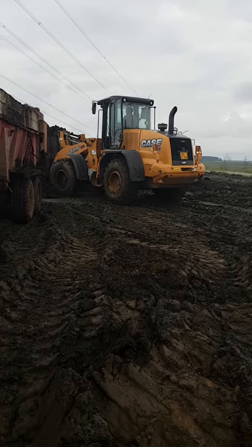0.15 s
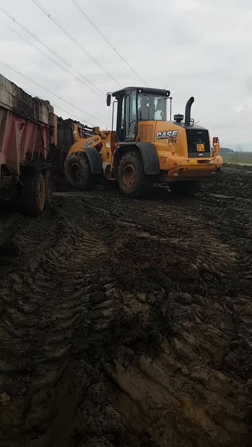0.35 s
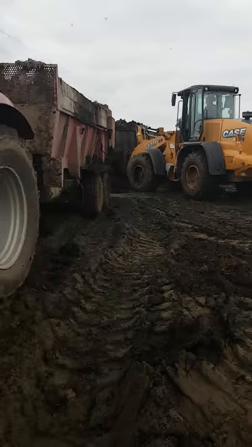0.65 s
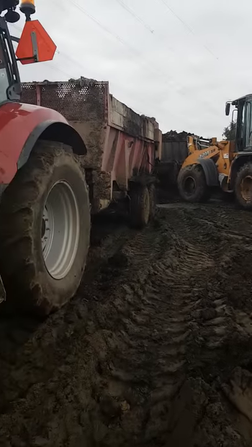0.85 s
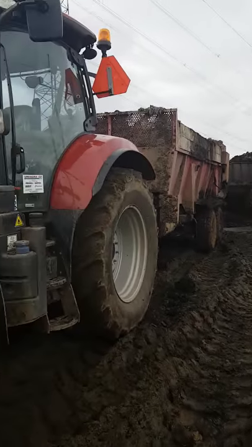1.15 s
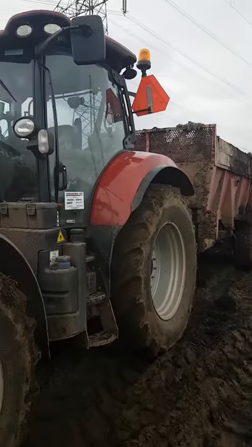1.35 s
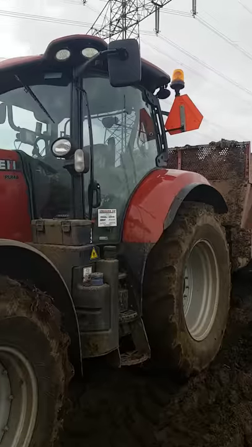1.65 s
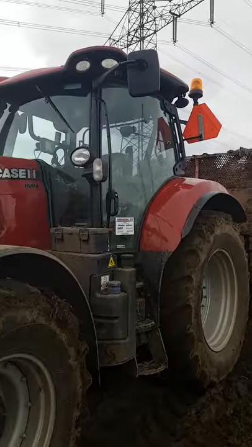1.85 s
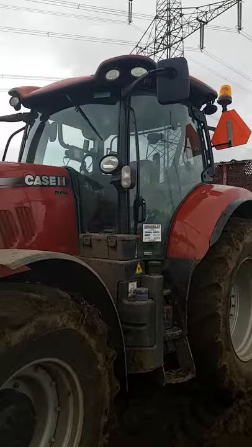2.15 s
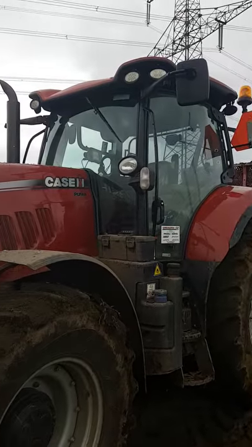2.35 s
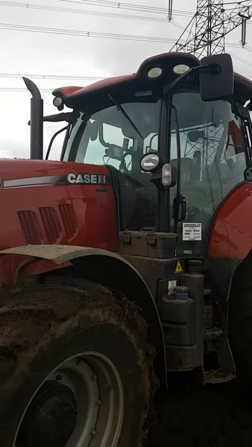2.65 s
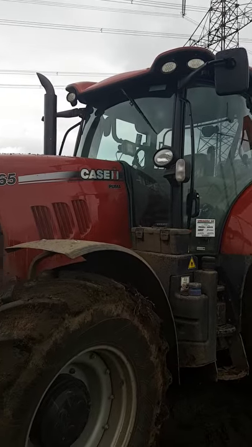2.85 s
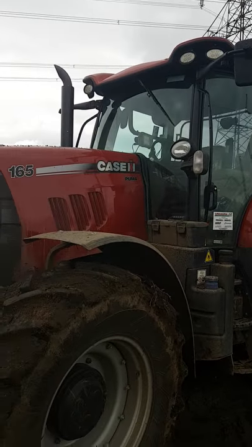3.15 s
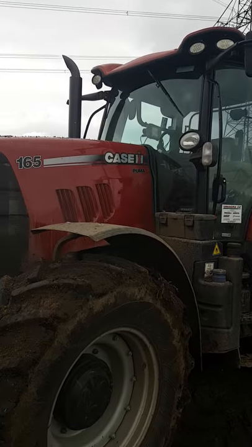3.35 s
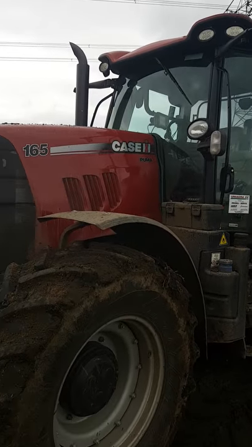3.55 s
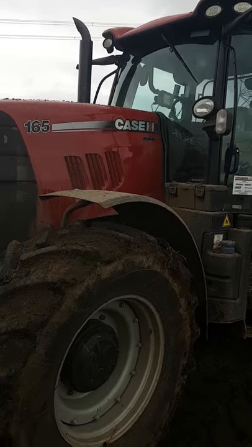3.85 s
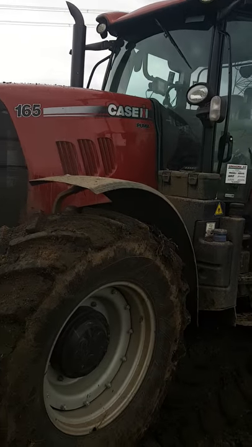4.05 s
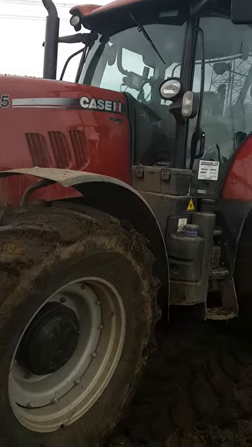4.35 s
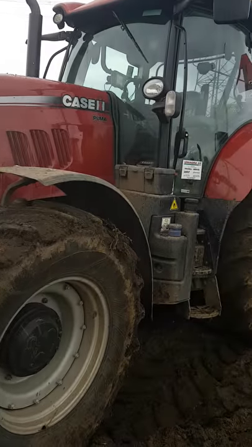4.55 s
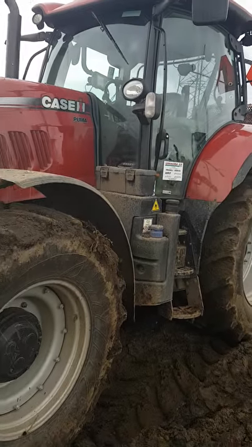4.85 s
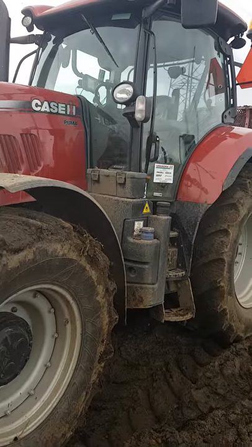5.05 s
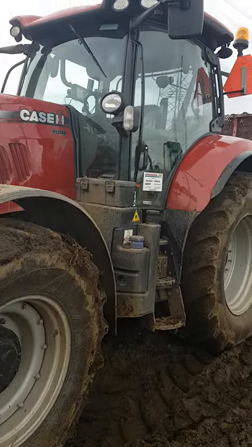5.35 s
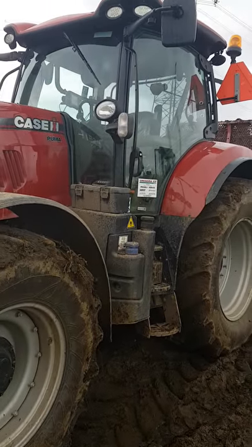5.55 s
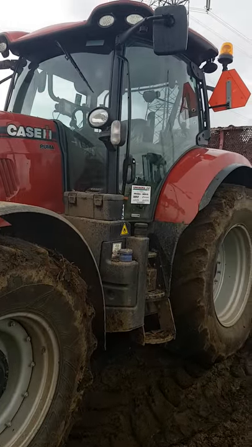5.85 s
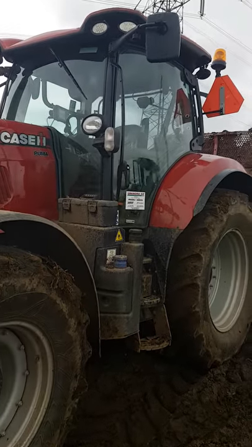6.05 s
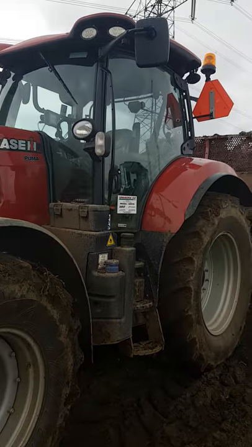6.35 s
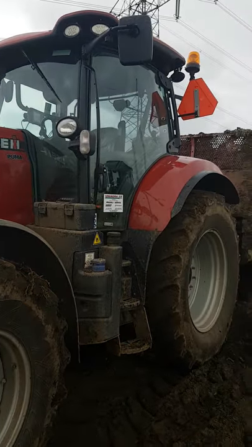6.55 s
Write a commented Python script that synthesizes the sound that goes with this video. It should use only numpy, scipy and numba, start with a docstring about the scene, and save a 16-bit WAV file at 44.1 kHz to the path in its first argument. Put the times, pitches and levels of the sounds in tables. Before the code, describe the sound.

A wheel loader's diesel roars and drones at high revs, dips and surges, then drops lower, beside a ticking idling tractor and squelching mud.

```python
"""A wheel loader works in a muddy field, heard from a hand-held phone beside an idling tractor. Its pump drones
in three partials, its exhaust note climbs and drops, and filtered noise makes the roar of fans and blocks, with
echoes off ground and steel, and an airy intake. The near tractor ticks, rings and squeaks in bursts timed by
its firings; swells of gritty noise squelch under the walker's feet, and once something clanks."""
import sys
import numpy as np
from scipy import signal
from scipy.fft import rfft, irfft
from scipy.io import wavfile
from scipy.ndimage import uniform_filter1d, map_coordinates
from numba import njit

SR = 44100
rng = np.random.default_rng(int(sys.argv[2]) if len(sys.argv) > 2 else 0)


def pcm_store(signal):
    """Save signal as 16-bit PCM."""
    levels = np.round(np.clip(np.atleast_2d(signal), -1, 1) * 32767)
    wavfile.write(sys.argv[1], SR, levels.astype(np.int16).T)


N = 295029


def undb(db):
    """Decibels to gain."""
    return 10 ** (np.asarray(db) / 20)


def level(x, db):
    """Scale to an rms level."""
    return x * undb(db) / np.sqrt(np.mean(x ** 2))


def curves(table):
    """Every column after the time column, interpolated to one value per sample."""
    s, *columns = np.transpose(table)
    t = np.arange(N) / SR
    return [np.interp(t, s, column) for column in columns]


def along(table, hz):
    """Read (hz, value) points on a log-frequency axis."""
    points_hz, values = np.array(table).T
    return np.interp(np.log(hz + 1), np.log(points_hz), values)


@njit
def svf(x, hz, width):
    """State-variable band-pass with a centre and width per sample, gain 1 at the centre."""
    y, band, low = np.empty(len(x)), 0., 0.
    for i in range(len(x)):
        g = np.tan(np.pi * hz[i] / SR)
        damping = width[i] / hz[i]
        v = (band + g * (x[i] - low)) / (1 + g * (g + damping))
        band = 2 * v - band
        low = low + 2 * g * v
        y[i] = damping * v
    return y


def bands(x, table):
    """Sum of fixed resonances, each filtered twice for steepness and set to its own rms level."""
    total = 0
    for hz, width_hz, db in table:
        centre, width = np.full(N, 1. * hz), np.full(N, 1. * width_hz)
        once = svf(x, centre, width)
        total = total + level(svf(once, centre, width), db)
    return total


def walk(rate):
    """Random levels held 1 / rate s and slewed twice; spread near 1."""
    hold = int(SR / rate)
    steps = np.repeat(rng.standard_normal(N // hold + 1), hold)
    slewed = uniform_filter1d(uniform_filter1d(steps, hold), hold)
    return 1.315 * slewed[:N]


def delayed(x, ms):
    """Read a sound a fixed or moving number of milliseconds late."""
    return map_coordinates(x, [np.arange(N) - ms * SR / 1e3], order=3, mode="mirror")


def stereo_noise():
    """Two noises, alike in the bass and mostly unrelated in the treble."""
    # likeness of the two microphones: hz, likeness (0-1)
    likeness = [(30, 0.94), (120, 0.96), (340, 1), (600, 1), (1070, 0.8), (1600, 0), (2300, 0.35),
                (3400, 0.3), (6000, 0), (15000, 0.1)]
    share = np.clip(along(likeness, np.fft.rfftfreq(N, 1 / SR)), 0, 1)
    mid, side = rfft(rng.standard_normal((2, N)))
    left_right = np.sqrt(1 + share) * mid + np.sqrt(1 - share) * side * np.array([[1], [-1]])
    return irfft(left_right, N) / np.sqrt(2)


def partials(hz, levels_db, flutter_db, waver):
    """Clean partials of one wavering pitch; the higher ones flutter more in the moving air."""
    phase = 2 * np.pi * np.cumsum(hz * (1 + waver * walk(12))) / SR
    total = 0
    for k, db in enumerate(levels_db, 1):
        gain = np.sqrt(2) * undb(db + k * flutter_db * walk(25))
        total = total + gain * np.sin(k * phase)
    return total


def pump():
    """Drone with two overtones following pump speed; also returns that speed in octaves from full."""
    # pump drone: start_s, pitch_hz, level_db, second_partial_db
    pump_curve = [(0.0, 203, -13, -51), (0.7, 204.6, -12, -37), (1.1, 206.6, -13, -31.5),
                  (1.54, 210.4, -16, -27), (1.87, 208.3, -23, -26.5), (2.09, 203.1, -26.5, -27),
                  (2.2, 197.9, -33, -26), (2.35, 181.4, -18, -32), (2.53, 175.1, -18, -32),
                  (2.75, 185.9, -21.5, -30), (2.97, 195, -24.5, -19.5), (3.3, 203.5, -26, -19.5),
                  (3.55, 206.5, -21.5, -22), (3.76, 203.5, -20, -21), (3.9, 191.9, -23.5, -21),
                  (3.97, 186.2, -19.5, -35), (4.07, 177.3, -14.5, -33), (4.2, 156.3, -26.5, -41),
                  (4.4, 127.6, -26.5, -47), (4.52, 116.3, -35, -54), (4.62, 121.3, -30, -45),
                  (4.73, 133.8, -23.5, -44), (4.95, 164.2, -24, -51), (5.17, 174.1, -27, -30.5),
                  (5.5, 161.8, -24, -35), (5.83, 168.8, -19, -27), (6.24, 179.8, -19, -40),
                  (6.6, 162.7, -20.5, -34), (6.69, 150.6, -22, -46)]
    full_hz = 205  # full speed
    hz, *levels_db = curves(pump_curve)
    octaves = np.log2(hz / full_hz)
    third_db = -33.5 + 66 * octaves  # dB at full speed and dB per octave: fades fast below it
    return partials(hz, levels_db + [third_db], flutter_db=.5, waver=0.00068), octaves


def exhaust():
    """The loader's firing rate heard as a low note with one overtone."""
    # exhaust note: start_s, firing_hz, level_db, second_partial_db
    exhaust_curve = [(0.0, 76.3, -28.5, -51), (0.3, 80.1, -28.5, -42), (0.6, 81.5, -31, -48),
                     (0.84, 91.4, -45, -50), (1.08, 95.0, -25.5, -42), (1.32, 99.3, -26, -33),
                     (1.6, 98.3, -27, -44), (1.92, 81.6, -42, -44), (2.16, 67.2, -29, -31),
                     (2.4, 65.5, -24, -44), (2.76, 71, -28, -52), (3.0, 77.6, -21.5, -50),
                     (3.3, 82.46, -25, -52), (3.6, 78.7, -25, -50), (3.72, 71.2, -36, -46),
                     (3.84, 66.2, -26.5, -40), (3.96, 64.6, -29, -41), (4.14, 55.2, -47, -54),
                     (4.32, 45, -31, -53), (4.44, 49.74, -27.5, -50), (4.92, 58.9, -26.5, -50),
                     (5.28, 59, -26.5, -33), (5.55, 61.4, -28, -42), (5.8, 62.1, -27.5, -31),
                     (6.12, 63.5, -24.5, -48), (6.48, 58.9, -31, -38), (6.69, 55.8, -39, -52)]
    hz, *levels_db = curves(exhaust_curve)
    return partials(hz, levels_db, flutter_db=0.3, waver=0.0042)


def roar(octaves):
    """Fan and block noise in seven regions, each wandering by itself, plus a bounce off the mud."""
    # overall swell of the roar: start_s, level_db (before the trim in the scene)
    overall = [(0, -27), (.75, -27), (1.5, -27.5), (2.1, -27), (2.5, -29.5), (3.0, -27), (3.5, -26.5),
               (3.85, -27.5), (4.25, -32), (4.7, -32.5), (5.05, -29.5), (5.6, -30.5), (6.2, -29),
               (6.69, -30)]
    # swell of the deepest region: start_s, change_db
    deep = [(0, 0.5), (1, 1.5), (2, -0.5), (3, -1), (3.7, -3), (4.5, 3.5), (5.5, 1.5), (6.3, 5.5),
            (6.69, 6.5)]
    # edges between deep, rumble, body, block, clatter, hiss and air: edge_hz
    edges_hz = (260, 500, 950, 1800, 3600, 9000)
    # those seven regions: level_db, extra_in_plain_sight_db, db_per_octave of pump speed
    regions = [(4.5, -1.5, 4), (7, -4, 4), (-2.5, 2.5, 0), (0.5, -6.5, 3.5), (-2.5, -0.5, 4), (-18, 1, -3),
               (-23.5, 0.5, 4)]
    # spectral shape inside the regions, blocks and exhausts: hz, relative_db per Hz
    block_colour = [(25, -21), (45, -21.5), (70, -5), (100, -9), (135, 0.5), (210, -6.5), (330, -9),
                    (500, -9.5), (700, -6.5), (1000, -15), (1300, -15), (1900, -21.5), (2350, -19),
                    (3100, -30.5)]
    # and above them cooling air: hz, relative_db per Hz
    hiss_colour = [(4200, -39), (4850, -45.5), (5700, -43.5), (7500, -48), (9500, -54.5), (11500, -55),
                   (15500, -59.5)]
    # bounce off the ground, its lag drifting as the phone moves: start_s, left_ms, right_ms
    ground_lag = [(0, 1.5, 1.04), (.6, 1.46, 1.22), (1.2, 1.1, 0.85), (2.2, 0.93, 0.77), (3.8, .75, 0.85),
                  (4.5, 0.92, 0.79), (6.69, 0.89, 0.78)]
    hidden_from_s, hidden_by_s = 0.47, 1.78  # the tractor slides in front of the loader

    hz = np.fft.rfftfreq(N, 1 / SR)
    in_sight = np.interp(np.arange(N) / SR, (hidden_from_s, hidden_by_s), (1, 0))
    coloured = rfft(stereo_noise()) * undb(along(block_colour + hiss_colour, hz))
    above = [np.ones_like(hz)]
    above += [1 / (1 + (edge / (hz + 1)) ** 6) for edge in edges_hz]
    above += [np.zeros_like(hz)]
    out = 0
    for k, (db, seen_db, per_octave_db) in enumerate(regions):
        region_db = db + seen_db * in_sight + per_octave_db * octaves
        if k == 0:
            region_db = region_db + curves(deep)[0]
        region = level(irfft(coloured * (above[k] - above[k + 1]), N), 0)
        out = out + region * undb(region_db + 0.53 * walk(13.0))
    out = out * undb(curves(overall)[0])
    # soft mud returns mainly the lower part of the sound, and the lag combs the roar
    soft = signal.sosfilt(signal.butter(1, .15, output="sos"), out)
    return np.array([x + 0.21 * delayed(y, ms) for x, y, ms in zip(out, soft, curves(ground_lag))])


def panels(sound):
    """Steel sides throw the sound back; the path lengths wander as the walker sways."""
    # echoes off the machines: lag_ms, level_db against the direct sound
    echoes = [(4.3, -19), (9.7, -16.5), (17, -20.5), (26, -24)]
    out = sound.copy()
    for lag_ms, db in echoes:
        path_ms = lag_ms + .5 * walk(1.5)
        out += undb(db) * np.array([delayed(x, path_ms) for x in sound])
    return out


def intake():
    """Smooth air noise in three wide resonances, likely the loader's intake."""
    # strongest early, while the loader is in plain sight: start_s, level_db (added to the bands)
    intake_swell = [(0, -57), (.5, -55), (1.2, -52.5), (1.8, -53.5), (2.3, -61), (3, -58), (3.7, -59),
                    (4.2, -63), (6.69, -75)]
    # airy resonances: centre_hz, width_hz, level_db
    intake_bands = [(4800, 660, 3.5), (7420, 3100, 4.5), (3580, 840, 7.5)]
    gain = undb(curves(intake_swell)[0] + 2.0 * walk(5.76))
    return gain * np.array([bands(x, intake_bands) for x in stereo_noise()])


def bursts(cycle, pattern_db, scatter_db, peak):
    """One uneven swell a cycle, topping at the given share of the cycle."""
    count = cycle.astype(int)
    pattern = np.array(pattern_db)[count % len(pattern_db)]
    size_db = pattern + scatter_db * rng.standard_normal(count[-1] + 1)[count]
    since = (cycle - count) / peak
    return undb(size_db) * since * np.exp(1 - since)


def tractor():
    """At idle each firing ticks in the valve gear, and a loose part rings and squeaks along."""
    # nearness, growing after 4 s as the walker comes beside the bonnet: start_s, nearness_db
    nearness = [(0, 3.5), (1, -3), (2, 2), (3, -1), (4, -2.5), (4.4, -0.5), (5.0, 1.5), (5.5, 2.5),
                (6.1, 3.5), (6.69, -1)]
    # tick sizes of the four cylinders: level_db
    cylinders_db = (0, -2, -1, 0)
    # valve gear resonances: centre_hz, width_hz, level_db
    tick_bands = [(6040, 2300, 1.5), (11040, 1100, -7), (14500, 2500, -18), (1150, 780, 18.5),
                  (2340, 440, 16)]
    # loose part resonances: centre_hz, width_hz, level_db
    ring_bands = [(3780, 86, 8), (3040, 210, 5), (2480, 83, -15), (1713, 92, 21)]
    # clear squeaks inside the ringing, upper and lower: pitch_hz
    squeaks_hz = (3790, 3200)
    # lower squeak, standing out only for a while: start_s, level_db
    lower_squeak = [(0, -64), (3.6, -58), (4.25, -48), (4.75, -48), (5.1, -58), (6.69, -62)]
    idle_hz = 32.47  # firings a second
    first_tick, first_ring = .25, 1.84  # firings already gone by at the start

    firings = np.arange(N) / SR * idle_hz
    near_db = curves(nearness)[0]
    tick_gain = undb(-59 + near_db)
    ring_gain = undb(-62 + 0.66 * near_db)
    squeaks_db = -56.5 + 1.6 * near_db, curves(lower_squeak)[0]
    tick = bursts(firings + first_tick, cylinders_db, scatter_db=2.0, peak=0.19)
    # rung hardest once a crank turn, every second firing
    ring = bursts(firings + first_ring, (0, -6), scatter_db=1.5, peak=0.28)
    tones = 0
    for hz, db in zip(squeaks_hz, squeaks_db):
        tones = tones + partials(np.full(N, 1. * hz), [db], flutter_db=1.2, waver=0.0049)
    squeak = ring * tones
    gear = []
    for x in stereo_noise():
        ticking = tick_gain * bands(tick * x, tick_bands)
        ringing = ring_gain * bands(ring * x, ring_bands)
        gear.append(ticking + ringing)
    # the squeaks come from another side than the loader: left .14 ms late, before the microphones' own lag
    return np.array(gear) + np.array([delayed(squeak, .14), squeak])


def mud():
    """Short swells of crackly hiss, most with a wet smack, as a boot pulls out of the mud; one, at 4.378 s, is
    a clank with a strong body."""
    # squelches, and a clank at 4.378 s: centre_s, level_db, length_s, left_minus_right_db, wet_body_db against
    # the level
    squelches = [(2.484, -43.5, 0.04, 0, 0), (2.863, -49, 0.037, 2, 11), (3.137, -45, .05, 0, 9),
                 (3.19, -49, 0.068, 3, 2), (4.352, -48, .03, 0, -4), (4.378, -52.5, 0.017, 2, 20.5),
                 (4.605, -54, .02, 0, 0), (4.647, -45, 0.039, -3, 10), (5.152, -44.5, 0.025, 0, 6),
                 (5.35, -45, 0.025, 3, 12)]
    # crackly hiss: centre_hz, width_hz, level_db
    hiss_bands = [(5872, 4900, -0.5), (8440, 8900, -1.5), (11900, 6700, -7.5), (14500, 3500, -14)]
    # wet body: centre_hz, width_hz, level_db
    smack_bands = [(1580, 290, 4), (2730, 450, -1)]
    t, hiss, smack = np.arange(N) / SR, np.zeros((2, N)), np.zeros((2, N))
    for s, db, length, pan_db, body_db in squelches:
        sides_db = db + np.array([[pan_db], [-pan_db]]) / 2
        swell = undb(sides_db) * np.exp(-.5 * ((t - s) / (length / 3)) ** 2)
        hiss += swell
        smack += swell * undb(body_db)
    hiss += undb(-62.5 + 3 * walk(14))  # faint shuffling all along
    grit = undb(2.1 * walk(400)) * stereo_noise()
    out = []
    for x, hiss_gain, smack_gain in zip(grit, hiss, smack):
        out.append(hiss_gain * bands(x, hiss_bands) + smack_gain * bands(x, smack_bands))
    return np.array(out)


def scene():
    """The loader's tones, roar and intake, the tractor and the mud."""
    drone, octaves = pump()
    loader = drone + exhaust() + undb(-2.5) * panels(roar(octaves)) + intake()
    return loader + tractor() + mud()


def record(dry):
    """Two differently shaded microphones a few centimetres apart, soft peaks and a cut top."""
    # shading of the two microphones: hz, left_over_right_db
    shading = [(60, -1), (360, -1), (600, 1), (900, -5.5), (1500, 0), (2250, -9), (3000, -4.5), (4200, 1),
               (7000, -1.5), (8300, 4.5), (9200, 2.5), (10800, 6.5), (12000, 2), (15000, 4)]
    left_lag_s, top_hz = -.000145, 15740  # negative lag: the left microphone hears first
    hz = np.fft.rfftfreq(N, 1 / SR)
    # half of the difference goes to each side
    half = undb(along(shading, hz) / 2) * np.exp(-1j * np.pi * hz * left_lag_s)
    wet = irfft(rfft(dry) * np.array([half, 1 / half]), N)
    soft_peaks = np.tanh(0.79 * wet) / 0.81
    return signal.sosfilt(signal.ellip(12, .2, 80, top_hz, fs=SR, output="sos"), soft_peaks)


dry = scene()
out = record(dry)
pcm_store(out)
```